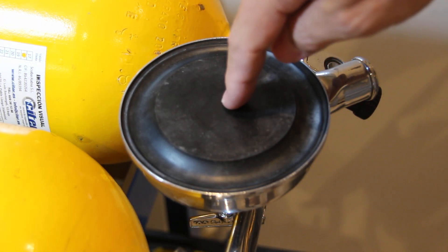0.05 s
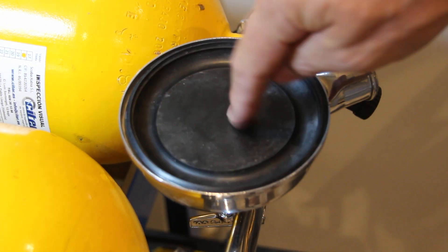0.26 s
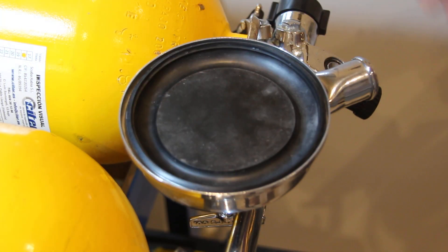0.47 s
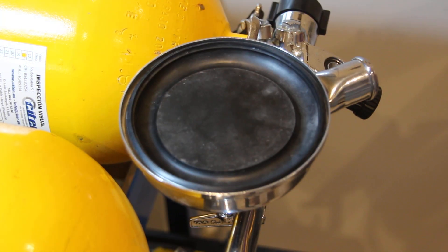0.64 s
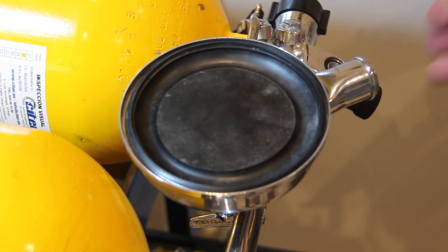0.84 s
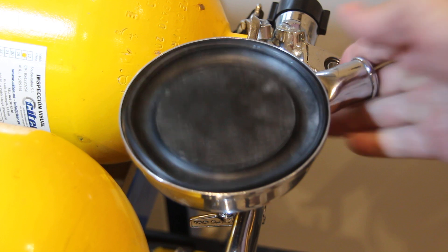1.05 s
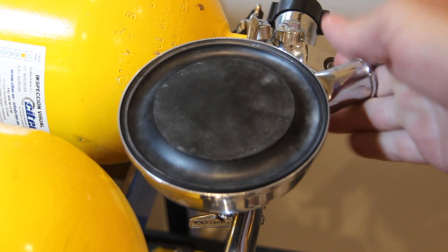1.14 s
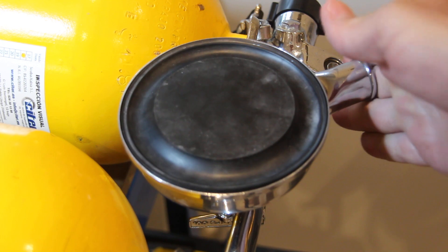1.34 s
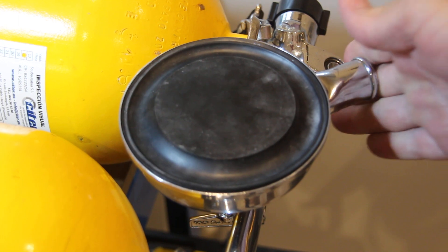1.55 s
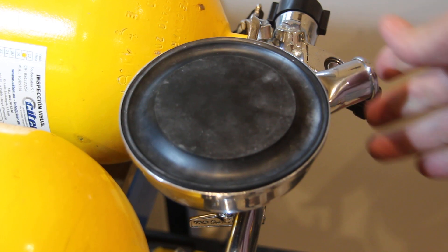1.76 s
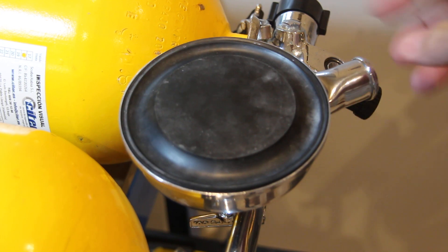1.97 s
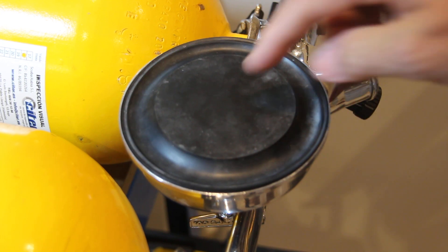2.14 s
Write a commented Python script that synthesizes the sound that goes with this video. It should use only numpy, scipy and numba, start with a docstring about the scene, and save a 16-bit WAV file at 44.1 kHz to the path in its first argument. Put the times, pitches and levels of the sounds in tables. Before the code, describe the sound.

A loud hiss of air from a diving regulator starts with a sharp pop at 0.2 seconds. It holds steady with a very high whistle, its draught buffeting the close microphone. At about 1.1 seconds a hand covers the mouthpiece; the hiss dulls, dips, spurts again and stops by 1.5 seconds. A short room echo fades while the closed valve holds a faint thin tone until just past 2 seconds.

```python
"""A diving regulator blowing air

A finger presses the diaphragm: the valve pops open and air hisses freely from the mouthpiece,
its draught buffeting the microphone. A hand cups the mouthpiece, the hiss dulls and stops,
the room rings out and the closed valve sings thinly. The jet overloads the microphone;
the gain control turns the sound down just after the pop, then creeps back."""
import sys
import numpy as np
from scipy import signal
from scipy.fft import rfft, irfft, next_fast_len
from scipy.io import wavfile
from scipy.ndimage import map_coordinates
from numba import njit

SR = 44100
rng = np.random.default_rng(int(sys.argv[2]) if len(sys.argv) > 2 else 0)


def pcm_store(signal):
    """Save signal as 16-bit PCM."""
    levels = np.round(np.clip(np.atleast_2d(signal), -1, 1) * 32767)
    wavfile.write(sys.argv[1], SR, levels.astype(np.int16).T)


N = 97020

# Tone of the open hiss: pitch_hz, level_db
JET_TONE = [(40, -38.5), (150, -25), (500, -13), (1000, -13.5), (1700, -7.5), (2700, 0.5), (4300, -0.5),
            (5600, 0.5), (8300, -1), (10000, 0), (11700, -2.5), (13500, -7), (15600, -11.5)]
# Where the open mouthpiece rings: pitch_hz, width_hz, level_db
MOUTHPIECE_RINGS = [(2675, 74, -22), (3300, 200, -23), (3710, 150, -32), (4930, 100, -17)]
# Whistle of air crossing the valve's edge: pitch_hz, width_hz, level_db
WHISTLE_TONES = [(10870, 200, -2), (10950, 110, 0), (11040, 200, -5)]
# The whistle's strength next to the hiss: time_s, level_db
WHISTLE_LOUDNESS = [(.23, -16), (.45, -14), (.7, -11), (.95, -11), (1.12, -20.5)]
OPEN_S = .2145
def free_jet(rise_s=.012, open_db=-6, cover_s=1.126, fade_db_per_s=157):
    """Air rushes out, hissing and whistling, until the hand covers the mouthpiece."""
    t = clock()
    flow = np.clip((t - OPEN_S) / rise_s, 0, 1) ** 2
    level_db = open_db - fade_db_per_s * np.maximum(t - cover_s, 0) + .17 * wobble(25)
    whistle = amp(curve(WHISTLE_LOUDNESS) + 2.45 * wobble(19)) * rings(WHISTLE_TONES)
    hiss = rush(JET_TONE, AIR_LIKENESS) + rings(MOUTHPIECE_RINGS)
    return flow * amp(level_db) * (hiss + whistle)


# Where the housing rings: pitch_hz, width_hz, level_db
HOUSING_RINGS = [(494, 150, -15.5), (1200, 270, -18), (2134, 1400, -4), (2710, 200, -1), (3350, 700, 0),
                 (6880, 1300, 3), (10400, 810, -2.5)]
POP_S = .2255
def pop(rise_s=.0028, fall_s=.008, level_db=-8.5):
    """The first burst of air rings the housing."""
    t = clock() - POP_S
    spike = np.exp(np.minimum(t / rise_s, -t / fall_s))
    opening = np.clip((clock() - OPEN_S) / rise_s, 0, 1) ** 2
    return amp(level_db) * spike * opening * rings(HOUSING_RINGS)


def thump(pitch_hz=414, swell_s=.0015, level_db=-11):
    """The sudden pressure gives the housing a short hollow thump."""
    t = clock() - POP_S
    swell = np.exp(-.5 * (t / swell_s) ** 2)
    return amp(level_db) * swell * np.sin(2 * np.pi * pitch_hz * t)


# Air escaping past the hand: time_s, level_db
LEAK_LOUDNESS = [(1.0, -47), (1.08, -7), (1.15, -24), (1.195, -24), (1.25, -12), (1.3, -12.5), (1.37, -13),
                 (1.43, -28), (1.5, -49), (1.619, -54), (1.801, -90)]
# Tone of the covered hiss: pitch_hz, level_db
LEAK_TONE = [(60, -44), (120, -30.5), (170, -17), (300, -18.5), (500, -17.5), (1000, -12), (1600, -5.5),
             (2300, -2.5), (3100, -0.5), (4400, 1), (6000, -1), (9000, -6.5), (11000, -8), (13000, -18),
             (15600, -32.5)]
# Where the cupped mouthpiece rings: pitch_hz, width_hz, level_db
CUPPED_RINGS = [(1930, 49, -21), (2364, 95, -14.5), (3004, 290, -12.5), (3310, 97, -15),
                (10850, 490, -17.5)]
def leak(flutter_db=.84):
    """A duller hiss squeezes past the hand until the valve shuts."""
    level_db = curve(LEAK_LOUDNESS) + flutter_db * wobble(39)
    return amp(level_db) * (rush(LEAK_TONE, AIR_LIKENESS) + rings(CUPPED_RINGS))


# Tone of the buffeting: pitch_hz, level_db
DRAUGHT_TONE = [(20, -18.5), (60, -10.5), (160, -2.5), (450, -1.5), (900, -2.5), (1600, -3), (3000, -15),
                (8000, -39)]
# How alike its left and right are: pitch_hz, likeness
DRAUGHT_LIKENESS = [(100, -.65), (1500, -0.66)]
# Where it sits: pitch_hz, left_louder_db, left_ahead_rad
DRAUGHT_PLACE = [(100, -3, 0), (600, 3.5, 0.0019)]
# How hard it blows: time_s, level_db
DRAUGHT_LOUDNESS = [(.23, -54), (.26, -20.5), (.43, -19), (.49, -14), (.7, -15.5), (.9, -14), (1.08, -15.5),
                    (1.13, -17.5), (1.18, -36), (1.3, -100)]
def draught(gust_db=-.6, lump_db=2, bass_hz=170):
    """The jet stirs the air at the microphone, lumpiest in the bass."""
    air = rush(DRAUGHT_TONE, DRAUGHT_LIKENESS)
    bass = filtered(air, lambda hz: 1 / (1 + (hz / bass_hz) ** 4))
    gusts = (air - bass) * amp(gust_db * wobble(30))
    lumps = bass * amp(lump_db * wobble(15))
    return panned(gusts + lumps, DRAUGHT_PLACE) * amp(curve(DRAUGHT_LOUDNESS))


# The valve's note swells and fades: time_s, level_db
NOTE_LOUDNESS = [(1.5, -75), (1.68, -52.5), (1.85, -56), (2.2, -63.5)]
def singing_valve(pitch_hz=1793, waver_hz=1.1, waver_db=-1.2, left_louder_db=-10.5):
    """The closed valve sings one thin note."""
    phase = 2 * np.pi * np.cumsum(pitch_hz + waver_hz * wobble(27)) / SR
    level_db = curve(NOTE_LOUDNESS) + waver_db * wobble(13)
    sides_db = left_louder_db * np.array([[.5], [-.5]])
    return amp(level_db + sides_db) * unit(np.sin(phase))


# Time the echo takes to fade by 60 dB: pitch_hz, fade_s
ECHO_FADE = [(150, .55), (1000, 0.91), (3000, 0.88), (6000, 0.73), (10000, .5), (15000, 0.21)]
def in_room(x, echo_db=-3.5, build_s=.0027):
    """The room adds an echo whose treble dies first."""
    hz, t, noise = signal.stft(rng.standard_normal((2, SR)), SR, nperseg=256)
    fade_s = np.maximum(along(ECHO_FADE, hz), .05)[:, None]
    tail = signal.istft(noise * amp(-60 * t / fade_s), SR, nperseg=256)[1]
    tail *= 1 - np.exp(-np.arange(tail.shape[1]) / SR / build_s)
    tail = paired(tail / np.linalg.norm(tail[0]), AIR_LIKENESS)
    return x + amp(echo_db) * signal.fftconvolve(x[:1], tail, axes=1)[:, :N]


# Tone of the room's own noise: pitch_hz, level_db
BACKGROUND_TONE = [(25, -39), (70, -9), (120, 0), (240, 3), (500, -5.5), (850, -1), (1400, -6),
                   (2500, -11.5), (5000, -17), (10000, -26), (15500, -31)]
# Where it sits: pitch_hz, left_louder_db, left_ahead_rad
BACKGROUND_PLACE = [(200, -2.1, 0.81), (3000, -1, .5)]
def background(level_db=-51.5, drift_db=1):
    """A faint, murky noise fills the room."""
    gain = amp(level_db + drift_db * wobble(18))
    return gain * panned(rush(BACKGROUND_TONE, AIR_LIKENESS), BACKGROUND_PLACE)


# How alike left and right are in the room: pitch_hz, likeness
AIR_LIKENESS = [(200, 0.41), (1000, .8), (3000, 0.53), (6000, .48), (9000, 0.24), (14000, .2)]
def rings(table):
    """Swirling air sets narrow bands of pitch ringing."""
    out = np.zeros((2, N))
    for hz, width, db in table:
        band = lambda f: (1j * f * width / (hz * hz - f * f + 1j * f * width)) ** 2
        out += amp(db) * unit(filtered(rng.standard_normal((2, N)), band))
    return paired(out, AIR_LIKENESS)


def rush(tone, likeness):
    """Stereo noise with the given tone, at strength 1."""
    noise = filtered(rng.standard_normal((2, N)), lambda hz: amp(along(tone, hz)))
    return unit(paired(noise, likeness))


def paired(x, likeness):
    """Blend two noises into left and right: likeness 1 is the same, 0 unrelated, -1 opposite."""
    turn = lambda hz: np.arccos(np.clip(along(likeness, hz), -1, 1)) / 2
    mid, side = filtered(x, lambda hz: np.array([np.cos(turn(hz)), np.sin(turn(hz))]))
    return np.array([mid + side, mid - side])


def panned(x, place):
    """Make one side louder and earlier, pitch by pitch."""
    f, db, lead = np.transpose(place)
    tilt = lambda hz: np.log(amp(along(np.c_[f, db], hz))) + 1j * along(np.c_[f, lead], hz)
    return filtered(x, lambda hz: np.exp(np.outer([.5, -.5], tilt(hz))))


def filtered(x, response):
    """Scale each pitch in x by response(hz)."""
    size = x.shape[-1]
    padded = next_fast_len(size + SR // 2)
    hz = np.fft.rfftfreq(padded, 1 / SR)
    return irfft(rfft(x, padded) * response(hz), padded)[..., :size]


def along(points, hz):
    """Read a table between its pitches, on a log scale."""
    pitches, values = np.transpose(points)
    return np.interp(np.log(hz + 1), np.log(pitches + 1), values)


def curve(points):
    """A loudness table as one level per sample, silent before it starts."""
    return np.interp(clock(), *np.transpose(points), left=-120)


def wobble(rate):
    """A smooth curve through rate random points a second."""
    return map_coordinates(rng.standard_normal(int(N * rate / SR) + 4), [clock() * rate])


def clock():
    """The time of each sample."""
    return np.arange(N) / SR


def amp(db):
    """Decibels to gain."""
    return 10 ** (np.asarray(db) / 20)


def unit(x):
    """Scale to an average strength (rms) of 1."""
    return x / np.sqrt(np.mean(x ** 2) + 1e-20)


# Where the pop, jet and leak sit: pitch_hz, left_louder_db, left_ahead_rad
POP_PLACE = [(500, -.5, .3), (8050, -0.9, -0.16)]
JET_PLACE = [(500, -2.5, -0.4), (4000, 3.7, -0.4), (8000, 4, 0.34), (12920, 5, -0.74)]
LEAK_PLACE = [(250, -5, 0.42), (1000, -2.5, 0.31), (2500, -1.2, .3), (8500, -0.5, .3), (12000, 1.5, 1.7)]
def scene():
    """Pop, jet and leak echo in the room; the other sounds join without echo."""
    air = panned(in_room(pop()), POP_PLACE)
    air += panned(in_room(free_jet()), JET_PLACE)
    air += panned(in_room(leak()), LEAK_PLACE)
    return air + thump() + draught() + singing_valve() + background()


@njit
def ducking(excess_db, attack_s=.011, hold_s=.31, release_db_per_s=12):
    """How many dB the gain control cuts: it grabs fast, holds, then lets go slowly."""
    out, cut, held = np.zeros(len(excess_db)), 0., 0
    for i in range(len(excess_db)):
        held = 0 if excess_db[i] > cut - 1 else held + 1
        if excess_db[i] > cut:
            cut += (excess_db[i] - cut) / (attack_s * SR)
        elif held > hold_s * SR:
            cut = max(cut - release_db_per_s / SR, 0.)
        out[i] = cut
    return out


CEILING, SENSE_S, DUCK_ABOVE_DB, TOP_HZ = .98, .008, -16, 15750
def record(dry):
    """The microphone overloads, the gain control ducks and the highest treble is cut off."""
    squashed = dry / (1 + (dry / CEILING) ** 6) ** (1 / 6)
    memory = np.exp(-1 / (SENSE_S * SR))
    power = signal.lfilter([1 - memory], [1, -memory], np.mean(squashed ** 2, axis=0))
    excess_db = 10 * np.log10(power + 1e-12) - DUCK_ABOVE_DB
    ducked = squashed * amp(-ducking(excess_db))
    return filtered(ducked, lambda hz: 1 / np.sqrt(1 + (hz / TOP_HZ) ** 600))


dry = scene()
out = record(dry)
pcm_store(out)
```